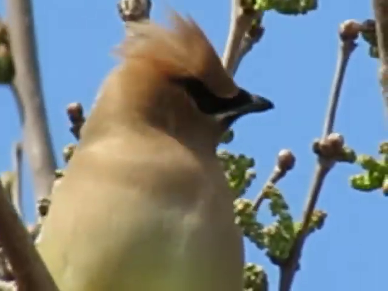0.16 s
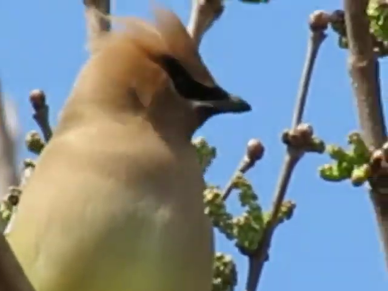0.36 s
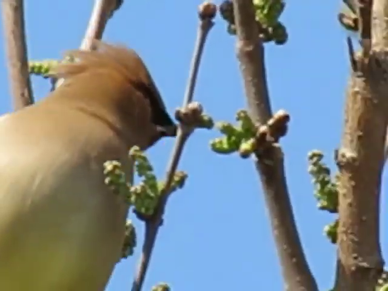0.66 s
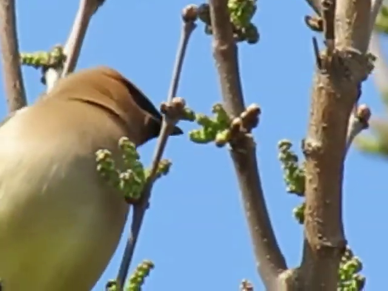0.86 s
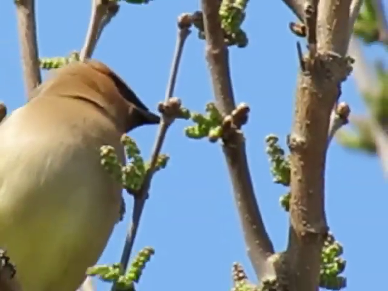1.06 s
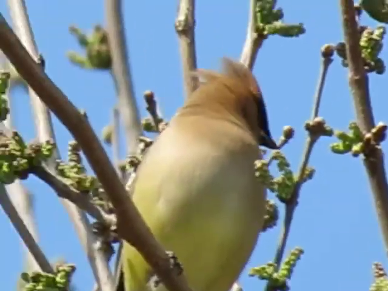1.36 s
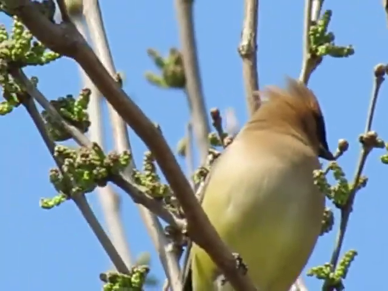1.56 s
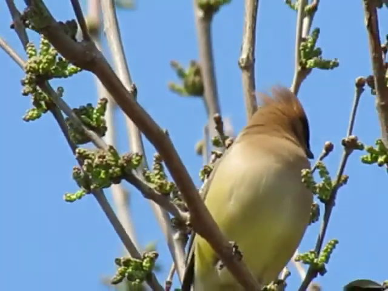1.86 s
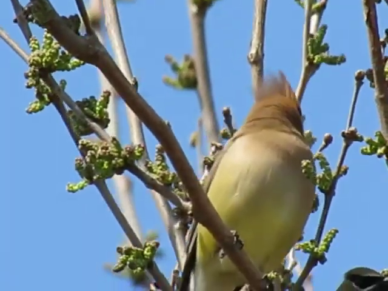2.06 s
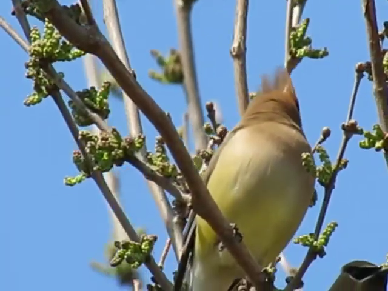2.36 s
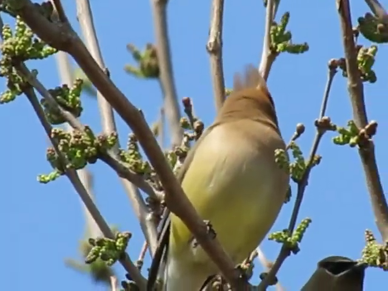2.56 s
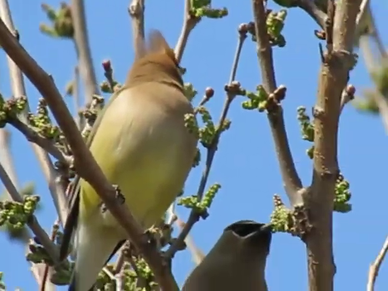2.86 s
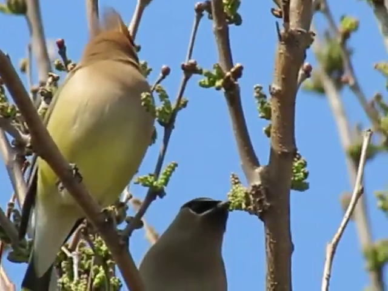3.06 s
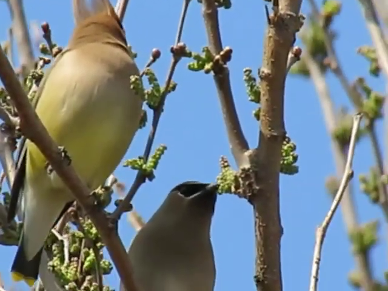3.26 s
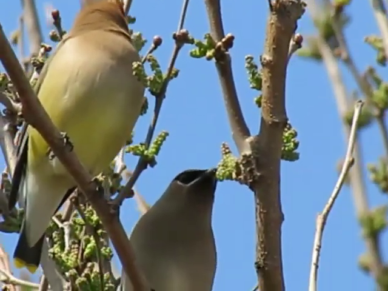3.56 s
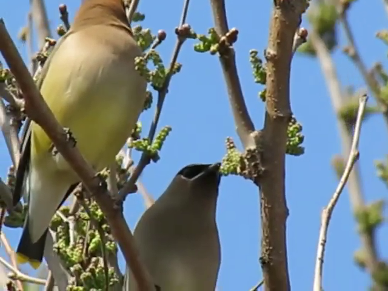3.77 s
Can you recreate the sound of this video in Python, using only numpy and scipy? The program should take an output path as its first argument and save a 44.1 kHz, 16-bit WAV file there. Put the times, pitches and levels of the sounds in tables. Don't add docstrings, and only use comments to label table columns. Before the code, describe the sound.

Birdsong outdoors: two quick bright sparrow chirps in the first second, then thin, very high gliding whistles overlapping from a tree, a small twig snap midway, low steady traffic rumble and hiss behind, captured in stereo.

```python
import sys
import numpy as np
from scipy import signal
from scipy.fft import rfft, irfft
from scipy.io import wavfile
from scipy.ndimage import uniform_filter1d, minimum_filter1d

SR = 44100
rng = np.random.default_rng(int(sys.argv[2]) if len(sys.argv) > 2 else 0)


def voltage_ratio(level):
    return 10 ** (np.asarray(level, float) / 20)


def output_pcm(signal):
    pcm = np.clip(np.atleast_2d(signal).T, -1, 1) * 32767
    wavfile.write(sys.argv[1], SR, np.round(pcm).astype(np.int16))


N = 172431


def read(points, hz):
    point_hz, value = np.transpose(points)
    return np.interp(np.log(hz + 1), np.log(point_hz + 1), value)


def evened(x):
    return x / np.sqrt(np.mean(x ** 2) + 1e-20)


def add(mix, start_s, sound):
    part = mix[round(start_s * SR):][:len(sound)]
    part += sound[:len(part)]


def drift(size, per_s):
    hz = per_s * np.geomspace(.1, 1, num=16)
    turns = np.arange(size)[:, None] / SR * hz + rng.random(16)
    return evened(np.sin(2 * np.pi * turns) @ hz ** -.3)


def band(x, centre_hz, width_hz):
    hz = np.fft.rfftfreq(len(x), 1 / SR)
    bell = np.exp(-.5 * ((hz - centre_hz) / width_hz) ** 2)
    return irfft(rfft(x) * bell, len(x))


def traffic():
    # frequency in Hz, density in dB per Hz.
    rumble = [(20, -34), (46, -28), (65, 1.34), (116, 1.4), (184, -9.5), (280, -3.5), (460, -13.5),
              (700, -8.5)]
    # frequency in Hz, density in dB per Hz.
    hiss = [(560, 1.5), (722, -4.5), (972, -2), (1600, -11), (2200, -18.5), (3520, -28), (8000, -39),
            (14700, -49)]
    # frequency in Hz, correlation.
    likeness = [(50, .9999), (110, .999), (170, .88), (290, .75), (600, .87), (1370, .86), (3000, .6),
                (8000, -.3)]
    # frequency in Hz, left minus right in dB.
    lean = [(90, 0), (250, -0.5), (1200, .9), (5000, .3)]
    rumble_db, hiss_db, cross_hz = -38, -41.5, 600
    patch_db, swell_db, swell_per_s = 1.39, 0.29, 4.32

    hz = np.fft.rfftfreq(2048, 1 / SR)
    low = 1 / (1 + (hz / cross_hz) ** 8)
    rumble_amp = voltage_ratio(read(rumble, hz)) * np.sqrt(low)
    hiss_amp = voltage_ratio(read(hiss, hz)) * np.sqrt(1 - low)
    rumble_amp *= voltage_ratio(rumble_db) / np.linalg.norm(rumble_amp)
    hiss_amp *= voltage_ratio(hiss_db) / np.linalg.norm(hiss_amp)
    colour = np.hypot(rumble_amp, hiss_amp)

    a, b, c, d, patches = rng.standard_normal((N // 512 + 5, 1025, 5)).T
    patches = uniform_filter1d(patches, size=8, axis=0)
    patches = evened(uniform_filter1d(patches, size=6, axis=1))
    same = np.clip(read(likeness, hz), -1, 1)[:, None]
    turn = voltage_ratio(read(lean, hz) / 2)[:, None]
    left = a + 1j * b
    right = same * left + np.sqrt(1 - same ** 2) * (c + 1j * d)
    z = np.array([left * turn, right / turn])
    z *= colour[:, None] * voltage_ratio(patch_db * patches)
    x = signal.istft(z, nperseg=2048, noverlap=1536)[1][:, :N]
    return evened(x) * np.hypot(voltage_ratio(rumble_db), voltage_ratio(hiss_db)) * voltage_ratio(swell_db * drift(N, swell_per_s))


def twigs():
    # start in seconds, peak level in dB, pitch in Hz, t60 in seconds.
    ticks = [
        (1.4975, -59, 10500, .016),
        (1.5046, -37, 3200, .022),
        (1.5046, -57, 10500, .03),
    ]
    # start in seconds, length in seconds, level in dB, centre in Hz, width in Hz.
    rustles = [
        (.455, .05, -54, 3500, 1200),
        (.5, .05, -60, 3500, 1000),
        (.575, .1, -58, 3700, 900),
        (1.827, .038, -51, 2530, 1290),
        (2.1, .13, -63, 4600, 900),
        (2.49, .05, -64, 5100, 500),
        (2.82, .14, -62, 4600, 1800),
        (3.09, .09, -66, 4700, 900),
    ]
    out = np.zeros((2, N))
    t = np.arange(1024) / SR
    for start_s, db, hz, t60_s in ticks:
        snap = rng.standard_normal((2, 1024))
        shape = np.minimum(t / .0006, 1) * voltage_ratio(db - 60 * t / t60_s)
        for side in range(2):
            ring = evened(band(snap[0] + .9 * side * snap[1], hz, .55 * hz))
            add(out[side], start_s, shape * ring)
    for start_s, length_s, db, hz, width_hz in rustles:
        noise = rng.standard_normal((2, 8192))
        u = np.arange(8192) / SR / length_s
        shape = voltage_ratio(db + 2.5 * drift(8192, 120)) * np.minimum(u / .25, 1) * np.exp(-2.5 * u ** 2)
        for side in range(2):
            rub = evened(band(noise[0] + .5 * side * noise[1], hz, width_hz))
            add(out[side], start_s, shape * rub)
    return out


def echoes(x):
    same, taps_per_s = 0.77, 1500
    t = np.arange(SR) / SR
    signs = rng.choice([-1., 1.], (2, SR))
    taps = signs * (rng.random((2, SR)) < taps_per_s / SR) * (t > .002)
    spread = np.gradient(taps[1]) * 1.5 * np.array([[.5], [-.5]])
    taps = same * taps[0] + np.sqrt(1 - same ** 2) * spread
    shape = 0
    for t60_s, db in ((.12, 2), (0.51, -11)):
        shape = shape + voltage_ratio(db - 60 * t / t60_s) / np.sqrt(t60_s)
    return signal.fftconvolve(x[None], taps * shape * 0.098, axes=1)[:, :N]


def voice(curve, tones, round_s, waver_hz, flutter_db, rasp_db, rasp_hz=900):
    s, hz, db = np.transpose(curve)
    t = np.arange(s[0], s[-1], 1 / SR)
    hz = uniform_filter1d(np.interp(t, s, hz), int(round_s * SR) + 1, mode="nearest")
    hz = hz + waver_hz * drift(len(t), 60)
    phase = 2 * np.pi * np.cumsum(hz) / SR
    breath = rng.standard_normal(N // 8)[:len(t)]
    fringe = voltage_ratio(rasp_db) * evened(band(breath, 0, rasp_hz))
    edges = np.clip(np.minimum(t - s[0], s[-1] - t) / 0.00071, 0, 1)
    level = edges * voltage_ratio(np.interp(t, s, db) + flutter_db * drift(len(t), 70))
    tone = 0
    for multiple, tone_db in tones:
        tone = tone + voltage_ratio(tone_db) * (1 + multiple ** 6 * fringe) * np.sin(multiple * phase)
    return s[0], np.sqrt(2) * level * tone


def whistles():
    # time in seconds, pitch in Hz, level in dB.
    near = [
        [(.572, 6380, -72), (.6, 6400, -62), (.612, 6570, -51.5), (.645, 6730, -50), (.668, 6650, -53),
         (.71, 6840, -49), (.79, 7240, -50), (.9, 7040, -52), (.965, 6910, -47), (.99, 6180, -71)],
        [(1.42, 6230, -62), (1.54, 7100, -50), (1.58, 7120, -53.5), (1.645, 7273, -45), (1.75, 7240, -43),
         (1.785, 7350, -78), (1.802, 7060, -42), (1.817, 6600, -76)],
        [(2.19, 6310, -59), (2.28, 6540, -52.5), (2.35, 6860, -47), (2.385, 7020, -46.5), (2.41, 7220, -50),
         (2.46, 7130, -47.5), (2.5, 7170, -48), (2.54, 7020, -55)],
        [(2.46, 7040, -50), (2.49, 6930, -49), (2.52, 6780, -54), (2.558, 6600, -66)],
    ]
    # time in seconds, pitch in Hz, level in dB.
    middle = [
        [(0, 6640, -68), (.07, 6800, -60), (.17, 6930, -65), (.3, 6930, -66.5), (.4, 6780, -68)],
        [(.2, 7030, -70), (.27, 7120, -72), (.42, 7080, -66.5), (.57, 6920, -70)],
        [(1.82, 6200, -71), (1.85, 6550, -72), (2.0, 6870, -64.5), (2.08, 6850, -62.5), (2.13, 6500, -70),
         (2.17, 6500, -74)],
        [(1.94, 6840, -76), (2.02, 7120, -75), (2.08, 7160, -74), (2.18, 7300, -66), (2.23, 7060, -68.5),
         (2.245, 6750, -65)],
        [(2.405, 6300, -70), (2.435, 6370, -70), (2.47, 6630, -80), (2.59, 6600, -76), (2.62, 6700, -69),
         (2.74, 6880, -77)],
        [(2.667, 6360, -71), (2.71, 6640, -64), (2.77, 6820, -65), (2.92, 6880, -64), (2.985, 6850, -63),
         (3.0, 6860, -59)],
    ]
    # time in seconds, pitch in Hz, level in dB.
    closing = [
        [(3.41, 6370, -62), (3.45, 6670, -64), (3.49, 6870, -75), (3.545, 6910, -60), (3.59, 6920, -74),
         (3.612, 6500, -66)],
        [(3.44, 6250, -71), (3.5, 6520, -77), (3.56, 6720, -73), (3.622, 6910, -67), (3.66, 6730, -75),
         (3.712, 6730, -61), (3.735, 6360, -81)],
    ]
    out = np.zeros((2, N))
    # curves, waver in Hz, flutter in dB, octave in dB, echo in dB
    groups = ((near, 23, 2, -34, -7.5), (middle, 18.5, -1.5, -28, -8), (closing, 15, 1.5, -19, -7))
    for curves, waver_hz, flutter_db, octave_db, echo_db in groups:
        for curve in curves:
            tones = [(1, 0.0054), (2, octave_db)]
            start_s, sound = voice(curve, tones, 0.0053, waver_hz, flutter_db, -54)
            add(out[0], start_s, sound)
            add(out[1], start_s, voltage_ratio(echo_db) * sound)
    return out


def sparrow():
    # time in seconds, pitch in Hz, level in dB.
    lead_ins = [
        [(.035, 2470, -65), (.06, 2765, -58), (.068, 2810, -55), (.078, 3020, -59), (.083, 3220, -67)],
        [(.675, 2690, -74), (.7, 2620, -57.5), (.722, 2810, -62)],
    ]
    feet = [
        [(.065, 2780, -56), (.072, 2990, -49), (.079, 3180, -56)],
        [(.703, 2920, -59), (.714, 2990, -56)],
    ]
    arches = [
        [(.081, 3260, -46), (.086, 3890, -35), (.093, 4320, -27), (.101, 4270, -32.5), (.115, 4336, -23.5),
         (.119, 3710, -30), (.1235, 3240, -32), (.133, 4780, -29.5), (.14, 3094, -36)],
        [(.714, 2980, -43.5), (.721, 3660, -33.5), (.727, 4100, -37), (.735, 4340, -36), (.748, 4350, -35),
         (.754, 4046, -32.5), (.761, 3190, -32), (.769, 4734, -33.5), (.777, 3170, -35.5)],
    ]
    warbles = [
        [(.147, 3420, -25.5), (.153, 3425, -40), (.161, 3510, -22.5), (.165, 3830, -44), (.171, 4090, -31.5),
         (.178, 3780, -28), (.1815, 3540, -32), (.186, 3630, -25)],
        [(.787, 3430, -32), (.791, 3400, -40), (.795, 3560, -31), (.803, 3984, -36), (.808, 3975, -44),
         (.812, 3896, -32.5), (.819, 3760, -43.5)],
    ]
    tails = [
        [(.194, 2400, -37.5), (.199, 3160, -33), (.205, 2710, -55), (.211, 3000, -33), (.217, 2740, -46),
         (.228, 2850, -62)],
        [(.825, 2580, -41.5), (.833, 3270, -40), (.839, 2840, -43), (.845, 3080, -46), (.852, 2930, -57),
         (.862, 2970, -56)],
    ]
    lead_tones, chirp_tones = [(1, 0), (2, 6), (4, -54.5)], [(1, 3), (2, -39), (3, -71)]
    rasp_db, echo_dbs = -30, (-5, .5)

    out = np.zeros((2, N))
    for lead_in, foot, arch, warble, tail, echo_db in zip(lead_ins, feet, arches, warbles, tails, echo_dbs):
        parts = (voice(lead_in, lead_tones, .004, 70, 2.6, -36.5),
                 voice(foot, chirp_tones, .002, 22, 1.5, rasp_db),
                 voice(arch + warble + tail, chirp_tones, 0.0026, 20, 1.3, rasp_db))
        for start_s, sound in parts:
            add(out[0], start_s, sound)
            add(out[1], start_s, voltage_ratio(echo_db) * sound)
    return out[0], band(out[1], 3600, 1500)


def scene():
    thin, thin_thrown = whistles()
    chirps, chirps_thrown = sparrow()
    pan = voltage_ratio(np.array([[1], [-1]]) * .4)
    return thin + chirps * pan + echoes(chirps_thrown + thin_thrown) + twigs() + traffic()


def low_pass(x):
    return signal.sosfilt(signal.butter(12, 14860, fs=SR, output="sos"), x)


def record(dry):
    mask_db, up_db_per_khz, down_db_per_khz, tilt_db_per_khz = -45.5, 5.3, 20, 2.3
    quiet_db, quiet_from_khz, top_db, top_khz = -3.4, 8.5, 7, 14.1
    gate_from_hz, edge_hz = 5250, 14800

    mid, side = dry[0] + dry[1], dry[0] - dry[1]
    hz, _, z = signal.stft(np.array([mid, side]) / 2, SR, nperseg=1024, noverlap=768)
    bands = z[:, :512].reshape(2, 64, 8, -1)
    power = uniform_filter1d((abs(bands) ** 2).sum(2), size=5, axis=2)
    power_db = 10 * np.log10(power + 1e-16)
    khz = hz[4:512:8] / 1000

    gap_khz = khz[:, None] - khz
    spread_db = np.where(gap_khz > 0, up_db_per_khz * gap_khz, -down_db_per_khz * gap_khz)
    spread_db = spread_db + 200 * (khz < 2.5) - tilt_db_per_khz * khz
    peak_db = -minimum_filter1d(-power_db[0], size=9, axis=1)
    masked_db = (peak_db[None] - spread_db[:, :, None]).max(1) + mask_db

    floor_db = np.median(power_db[0], axis=1) + quiet_db
    floor_db = floor_db + top_db * (khz > top_khz) - 200 * (khz < quiet_from_khz)
    masked_db = np.maximum(masked_db, floor_db[:, None])

    excess_db = np.clip(8 * (masked_db - power_db), -200, 200)
    keep = 1 / (1 + voltage_ratio(excess_db - 400 * (khz[:, None] * 1000 < gate_from_hz)))
    z[:, :512] = (bands * keep[:, :, None]).reshape(2, 512, -1)
    z = z * (hz < edge_hz)[:, None]
    mid, side = signal.istft(z, SR, nperseg=1024, noverlap=768)[1][:, :N]
    return low_pass(np.array([mid + side, mid - side]))


dry = scene()
out = record(dry)
output_pcm(out)
```